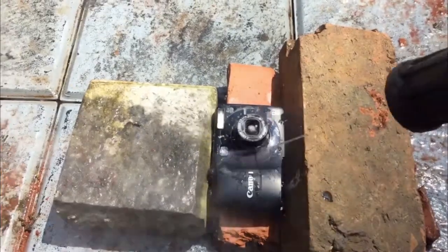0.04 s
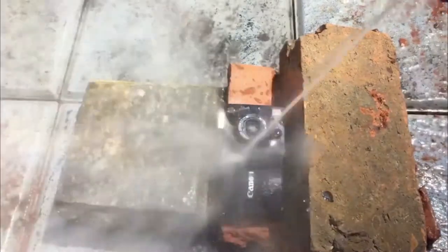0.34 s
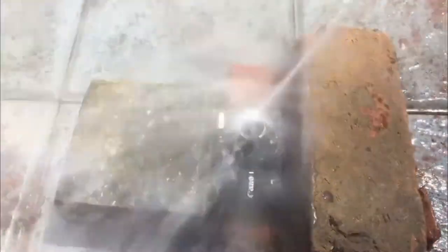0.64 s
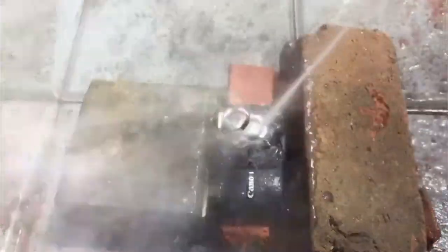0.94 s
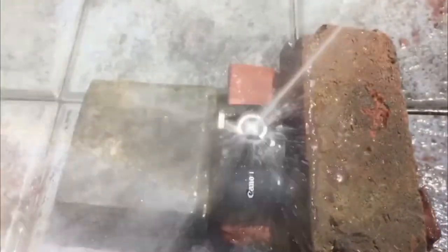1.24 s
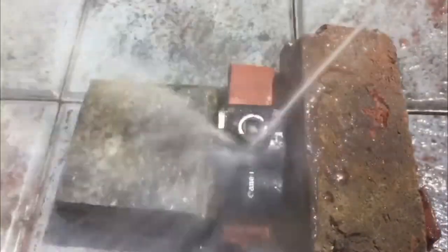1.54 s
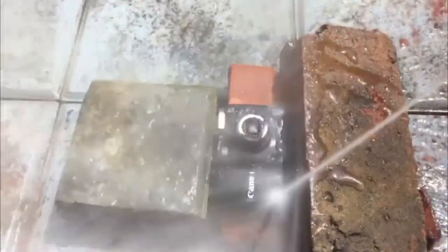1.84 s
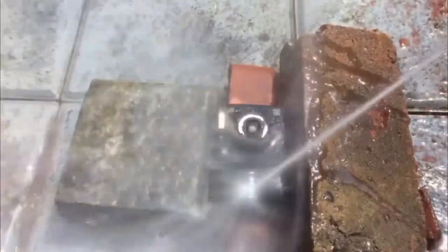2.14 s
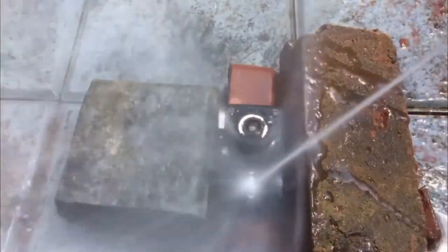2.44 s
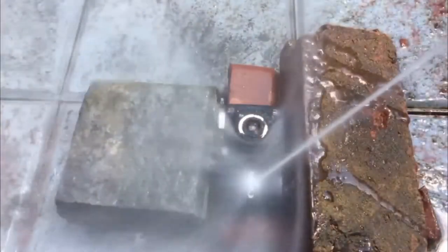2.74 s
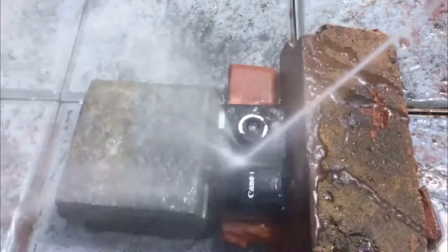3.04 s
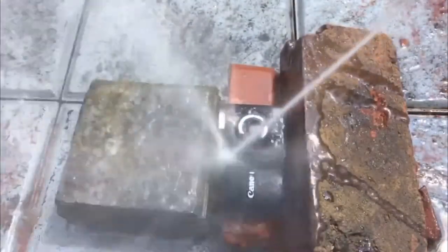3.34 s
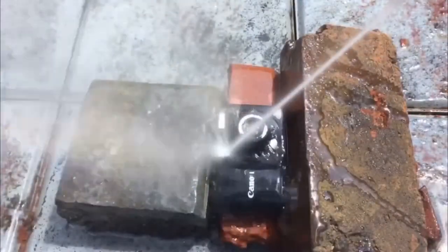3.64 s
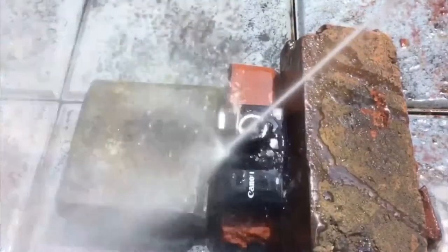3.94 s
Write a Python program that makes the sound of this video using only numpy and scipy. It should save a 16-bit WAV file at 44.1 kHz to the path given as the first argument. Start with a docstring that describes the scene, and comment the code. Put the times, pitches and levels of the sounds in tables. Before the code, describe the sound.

A pressure washer spits briefly, then fires two long blasts at a small camera between bricks. The hissing, spattering jet shifts tone as it wanders, mist buffets the close microphone, and a pump hums faintly in the yard.

```python
"""Pressure washer on a small camera

A pressure washer fires a short spit and two long blasts at a camera wedged between bricks on paving.
The jet is a dense hail of drops whose tone depends on what it hits: an edge, the lens or the flat body.
Gaps ring as water crosses them, and plumes of mist buffet the close microphone.
The pump hums faintly over the low background of the yard. The sound is mono."""
import sys
import numpy as np
from scipy import signal
from scipy.fft import rfft, irfft
from scipy.io import wavfile
from scipy.ndimage import map_coordinates

SR = 44100
rng = np.random.default_rng(int(sys.argv[2]) if len(sys.argv) > 2 else 0)


def dump(signal):
    """Clip the signal to [-1, 1] and save it as 16-bit WAV at the path in sys.argv[1]."""
    limited = np.clip(np.atleast_2d(signal).T, -1, 1)
    pcm = np.round(limited * 32767).astype(np.int16)
    wavfile.write(sys.argv[1], SR, pcm)


N = 176400
TOP_HZ = 15700  # the treble ends here


def jet():
    """Drops drum on whatever the wandering jet hits, and the spray has a hollow rasp."""
    # How loud each target and the rasp are over time: time_s, level_db
    edge_levels = [(.12, -27.5), (.25, -22), (.33, -16), (.42, -20), (.48, -20.5), (.62, -21), (.68, -31.5),
                   (1.395, -32.5), (1.422, -23.5), (1.51, -26), (1.61, -20.5), (1.72, -40), (2.1, -26.5),
                   (2.75, -28), (2.95, -23), (3.2, -21), (3.35, -19), (3.7, -21), (4, -20.5)]
    lens_levels = [(.5, -48), (.63, -25), (.85, -23), (.92, -20.5), (1.04, -24), (1.18, -20.5),
                   (1.225, -27), (1.345, -19.5), (1.368, -29), (1.5, -40.5)]
    body_levels = [(1.65, -33), (1.9, -21.5), (2.04, -22), (2.12, -17), (2.25, -20.5), (2.68, -20),
                   (2.9, -21.5), (3.1, -25.5), (3.25, -23.5), (3.6, -57)]
    rasp_levels = [(.06, -32), (.102, -24), (.121, -19), (.134, -22), (.29, -27.5), (.44, -21), (.7, -27),
                   (1.42, -50), (1.6, -31.5), (1.685, -22), (1.86, -21), (1.877, -13), (1.94, -17),
                   (2.06, -19.5), (2.1, -25), (3.22, -29.5), (3.45, -62)]
    # The tone of each one: pitch_hz, level_db
    edge_tone = [(800, -9), (1130, -8.5), (1250, -5), (1870, -11), (2650, -3.5), (3050, -10.5),
                 (3550, -6.5), (4020, -1), (4700, -4.5), (5250, -2), (5870, -6.5), (7440, -8.5), (8010, -2),
                 (9080, 0.5), (11500, 0.5), (13800, -1), (15500, -2)]
    lens_tone = [(600, -11.5), (1080, -10), (1610, -13.5), (2400, -9), (4190, -6), (4990, -16),
                 (5650, -12.5), (7070, -5), (11200, 1.5), (13000, -2), (14200, -13)]
    body_tone = [(600, -6.5), (929, -1.5), (1040, -8.5), (1270, -0.5), (1810, -9.5), (2380, -4.5),
                 (3400, -11.5), (3900, -13.5), (4800, -9.5), (5450, -3), (6460, -9), (8260, -16),
                 (9600, -23), (11000, -2.5), (12400, 0), (14500, -13.5)]
    rasp_tone = [(700, -10), (995, -4.5), (1260, -2.5), (1430, -2.5), (1740, -8.5), (3340, -4.5),
                 (3900, -7), (5400, -7), (7010, -8), (8190, -9.5), (10800, -9), (12600, -3), (14500, -5.5)]
    edge = curve(edge_levels) * shape_tone(drops(), edge_tone, low_hz=40)
    lens = curve(lens_levels) * shape_tone(drops(), lens_tone, low_hz=61)
    body = curve(body_levels) * shape_tone(drops(), body_tone, low_hz=61)
    rasp = curve(rasp_levels) * shape_tone(drops(), rasp_tone, low_hz=60)
    return edge + lens + body + rasp


def drops():
    """Countless uneven impacts in fine mist; the jet breaks up, so they come in clumps."""
    drops_per_s, spread_db = 6000, 2.5
    mist_db, mist_hz = -5, 7000  # above this pitch the drops give way to smooth mist
    hits = rng.random(N) < drops_per_s / SR
    sizes = gain(spread_db * np.minimum(rng.exponential(size=N), np.pi))
    impacts = unit(hits * sizes * rng.choice([-1, 1], N))
    mist = rng.standard_normal(N)
    drop_share = 1 / (1 + gain(mist_db) ** 2 + (pitches() / mist_hz) ** 2)
    hail = irfft(np.sqrt(drop_share) * rfft(impacts) + np.sqrt(1 - drop_share) * rfft(mist), N)
    clumps = gain(0.96 * wander(per_s=34.85))
    return brick_echo(hail * clumps)


def valve():
    """Water flow builds up after each pull of the trigger and dies away after each release."""
    # Trigger pulls: start_s, release_s
    pulls = [(0.04, 0.13), (0.248, 1.689), (1.801, 4.1)]
    open_s, close_s = 0.037, 0.039  # time to open fully, time to fall by 30 dB
    t = clock()
    flow = np.zeros(N)
    for start_s, release_s in pulls:
        opening = np.clip((t - start_s) / open_s, 0, 1) ** 2
        closing = gain(-30 * np.maximum(t - release_s, 0) / close_s)
        flow += opening * closing
    return flow


def hollows():
    """Drops make each gap ring at its own pitch while the water crosses it."""
    # Ringing gaps: peak_s, half_length_s, pitch_hz, width_hz, level_db
    gaps = [(0.076, 0.013, 1270, 200, -34), (0.105, 0.008, 550, 120, -35),
            (0.123, 0.0069, 1230, 300, -21.5), (0.116, 0.0099, 3700, 900, -25),
            (0.16, 0.035, 595, 300, -40), (0.386, 0.061, 3900, 2400, -27),
            (1.673, 0.0085, 1370, 300, -32.5), (1.846, 0.019, 1340, 220, -24),
            (1.88, 0.017, 3300, 600, -21.5), (1.882, .016, 12600, 700, -18.5),
            (1.938, 0.05, 1330, 260, -25), (2.01, .06, 14400, 1200, -27), (2.13, 0.027, 6300, 600, -29),
            (2.63, .08, 5520, 600, -28.5), (2.766, 0.049, 6100, 450, -32), (2.8, 0.2, 1290, 140, -33.5),
            (2.987, 0.08, 2500, 400, -30), (3.213, 0.065, 3840, 700, -27)]
    hail_spectrum = rfft(drops())
    ringing = np.zeros(N)
    for peak_s, half_length_s, pitch_hz, width_hz, level_db in gaps:
        band = hail_spectrum / (1 + (2 * (pitches() - pitch_hz) / width_hz) ** 2)
        ringing += gain(level_db) * swell(peak_s, half_length_s) * unit(irfft(band, N))
    return ringing


def plumes():
    """Spray bounces off and swirls over the microphone: a low rumble and a bright spatter."""
    # Puffs of mist that arrive: peak_s, half_length_s, rumble_db, spatter_db
    puffs = [(0.34, 0.02, -21.5, -37), (0.394, 0.032, -24.5, -30), (0.636, .015, -14.5, -16.5),
             (0.731, 0.015, -37, -17), (0.799, 0.012, -37.5, -21), (0.977, 0.023, -26, -17),
             (1.099, 0.02, -30, -18.5), (1.131, 0.015, -15, -19.5), (1.185, 0.035, -26, -27),
             (1.267, 0.022, -29, -21), (1.293, 0.012, -18, -25), (3.297, 0.027, -28.5, -19.5),
             (3.584, 0.025, -22.5, -20.5), (3.697, 0.02, -29.5, -21.5), (3.97, 0.039, -25.5, -23.5)]
    # The tone of the two parts: pitch_hz, level_db
    rumble_tone = [(20, -22), (45, 1), (130, -2.5), (250, -4.5), (500, -15), (1200, -16.5), (3000, -26),
                   (8000, -25)]
    spatter_tone = [(500, -10.5), (4500, -12.5), (5600, -5), (7500, -2.5), (8300, 1), (9400, 2),
                    (10500, -2), (11200, 5.5), (12300, 1), (14300, -10), (15700, -4)]
    swirls = gain(1.55 * wander(per_s=180))
    rumble = shape_tone(swirls * rng.standard_normal(N), rumble_tone)
    spatter = shape_tone(np.sqrt(swirls) * drops(), spatter_tone)
    return sum(swell(peak_s, half_length_s) * (gain(rumble_db) * rumble + gain(spatter_db) * spatter)
               for peak_s, half_length_s, rumble_db, spatter_db in puffs)


def pump():
    """The working pump hums, slightly unsteady in pitch and loudness."""
    # The tones in the hum: pitch_multiple, level_db
    tones = [(1, -47), (2, -42), (4, -49), (5, -55)]
    # How the whole hum rises and falls: time_s, change_db
    changes = [(1.7, -6.5), (1.95, 3), (2.8, 0.5), (3.4, -7)]
    pitch_hz = 143.1 * (1 + 0.007 * wander(per_s=18))
    phase = 2 * np.pi * np.cumsum(pitch_hz) / SR
    hum = sum(gain(level_db + 2 * wander(per_s=21)) * np.sqrt(2) * np.sin(multiple * phase)
              for multiple, level_db in tones)
    return hum * curve(changes)


def brick_echo(sound):
    """Nearby bricks bounce the treble back quickly, smearing each impact."""
    echo_db, fade_s, low_hz = -11.5, 0.006, 2000
    t = np.arange(1024) / SR
    burst = rng.standard_normal(len(t)) * np.exp(-t / fade_s)
    echo = signal.lfilter(*signal.butter(2, low_hz, "high", fs=SR), burst)
    return sound + gain(echo_db) * signal.fftconvolve(sound, echo / np.linalg.norm(echo))[:N]


def yard_echo(sound):
    """Distant walls leave a short, dull echo in the pauses."""
    echo_db, fade_s, high_hz = -24.5, 0.36, 1900
    burst = unit(rng.standard_normal(N)) * gain(-60 * clock() / fade_s)
    echo = signal.lfilter(*signal.butter(2, high_hz, fs=SR), burst)
    return sound + gain(echo_db) * signal.fftconvolve(sound, echo / np.linalg.norm(echo))[:N]


def outdoors():
    """The low, dull background of the yard sinks over the first two seconds."""
    # The tone of the background: pitch_hz, level_db
    tone = [(25, -20), (80, -4), (200, -8), (400, -29), (2500, -28), (5000, -41), (15000, -42)]
    start_db, fall_db_per_s = -41, 5
    level_db = start_db - fall_db_per_s * np.minimum(clock(), 2) + wander(per_s=8)
    return gain(level_db) * shape_tone(rng.standard_normal(N), tone)


def shape_tone(sound, tone, low_hz=20):
    """Filter by (pitch_hz, level_db) points, trim the deep bass and the top, and scale to strength 1."""
    hz = pitches()
    pitch_hz, level_db = np.array(tone).T
    shape = gain(np.interp(np.log(hz), np.log(pitch_hz), level_db))
    trim = (hz < TOP_HZ + 200) / np.sqrt(1 + (low_hz / hz) ** 4)
    return unit(irfft(rfft(sound) * shape * trim, N))


def curve(points):
    """A volume curve through (time_s, level_db) points."""
    return gain(np.interp(clock(), *np.array(points).T))


def swell(peak_s, half_length_s):
    """A bell-shaped rise and fall."""
    return .5 ** (((clock() - peak_s) / half_length_s) ** 2)


def wander(per_s):
    """A random drift of strength 1 that heads for a new value per_s times a second."""
    points = rng.standard_normal(8192)
    return unit(map_coordinates(points, [clock() * per_s], order=1, mode="wrap"))


def gain(db):
    """Turn decibels into a volume factor."""
    return 10 ** (np.asarray(db) / 20)


def unit(sound):
    """Scale to an average strength (rms) of 1."""
    return sound / np.sqrt(np.mean(sound ** 2))


def clock():
    """The time of every sample, in seconds."""
    return np.arange(N) / SR


def pitches():
    """The pitch of every point in the spectrum, in Hz, kept just above zero."""
    return np.arange(N // 2 + 1) * SR / N + 1e-3


def scene():
    """All sources together, the same in both channels."""
    washer = valve() * (jet() + pump()) + hollows()
    mono = yard_echo(washer) + plumes() + outdoors()
    return np.array([mono, mono])


def record(dry):
    """The microphone's opening weakens one narrow band; the recorder cuts off the highest treble."""
    dip_hz, dip_db = 7620, -3
    band = signal.lfilter(*signal.iirpeak(dip_hz, Q=11, fs=SR), dry)
    heard = dry - (1 - gain(dip_db)) * band
    return signal.sosfilt(signal.ellip(12, .1, 80, TOP_HZ, fs=SR, output="sos"), heard)


dry = scene()
out = record(dry)
dump(out)
```